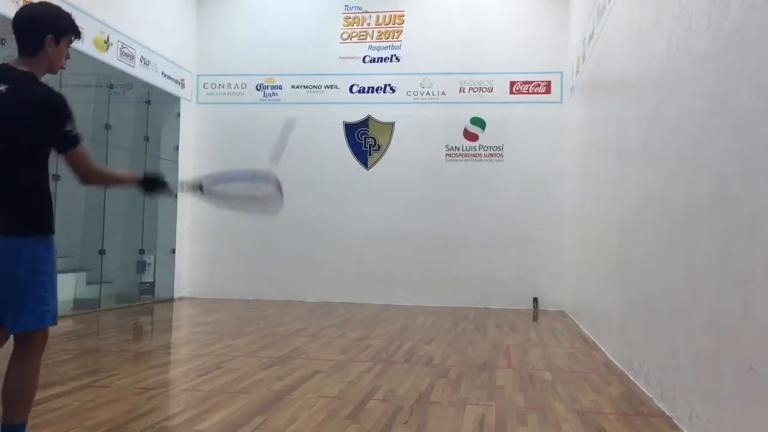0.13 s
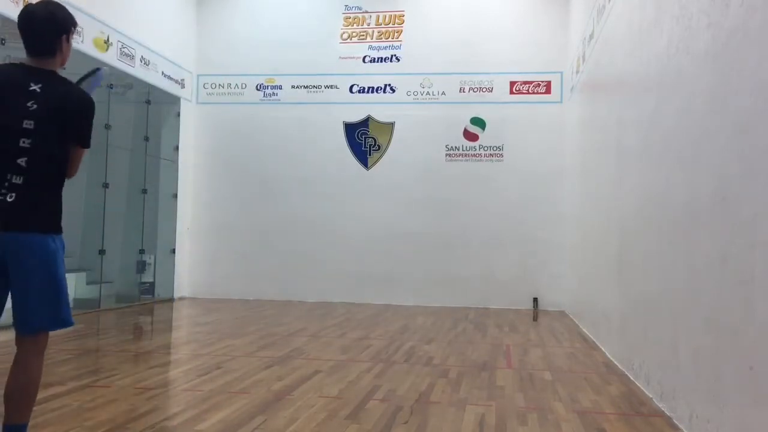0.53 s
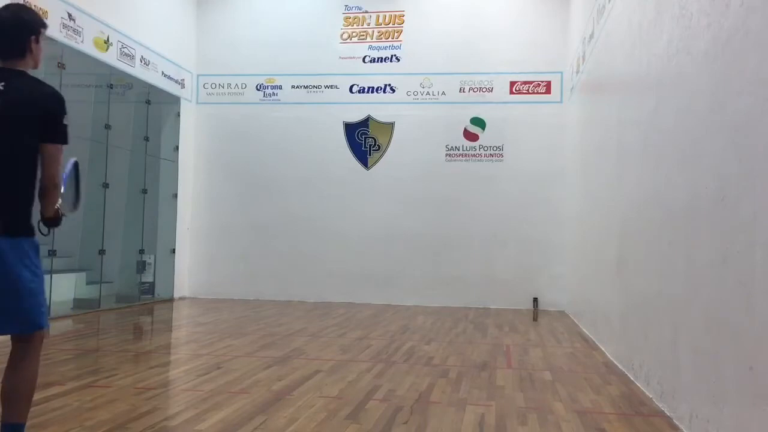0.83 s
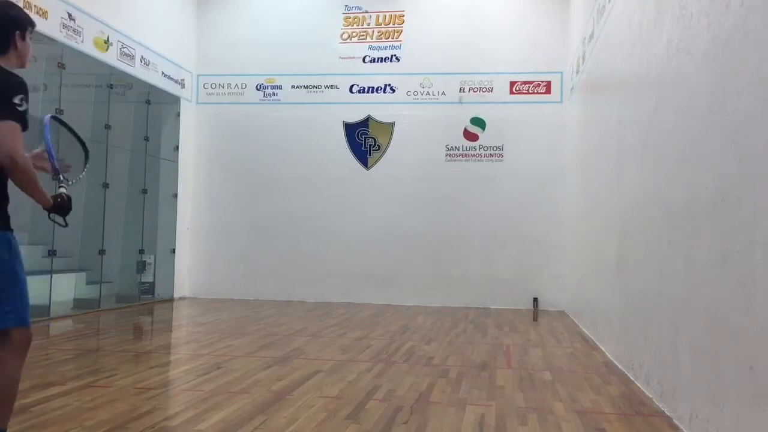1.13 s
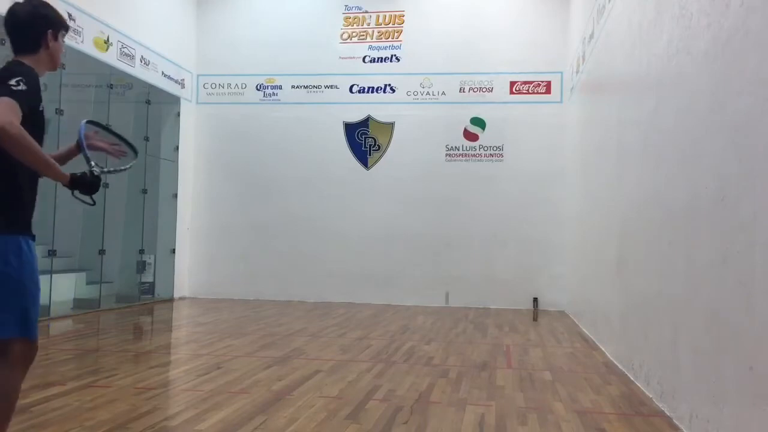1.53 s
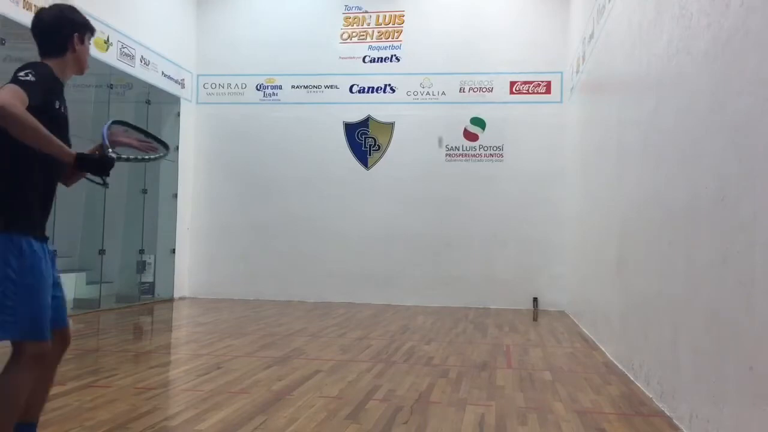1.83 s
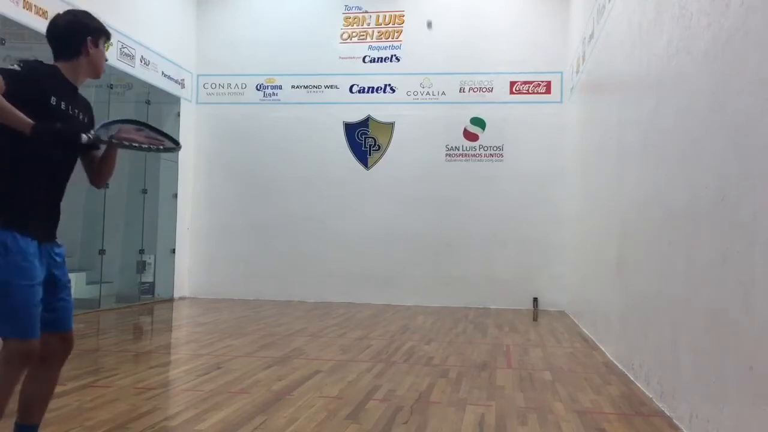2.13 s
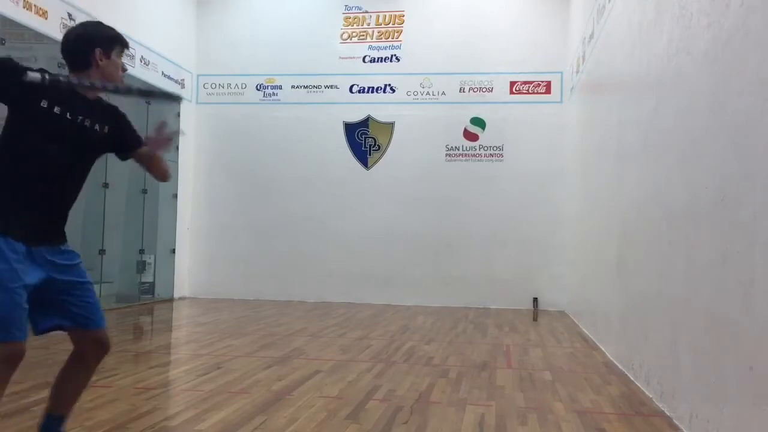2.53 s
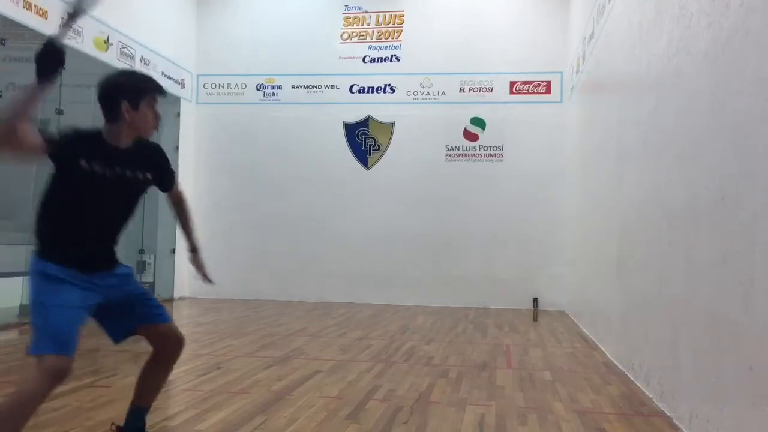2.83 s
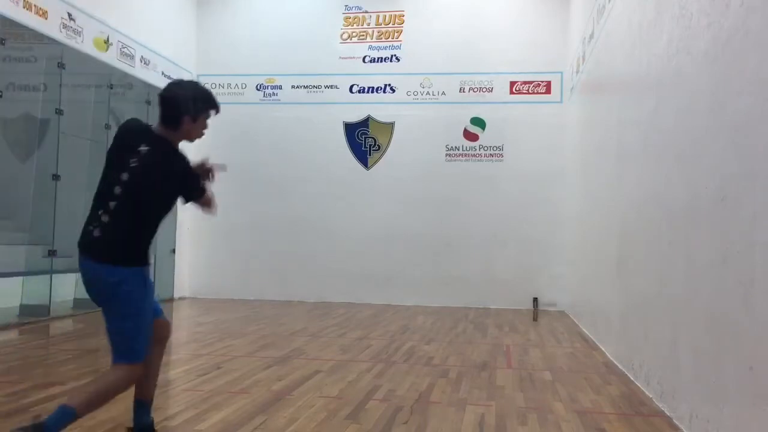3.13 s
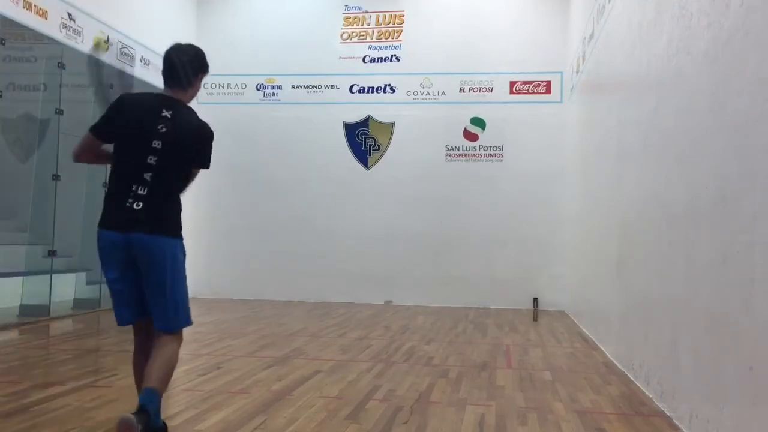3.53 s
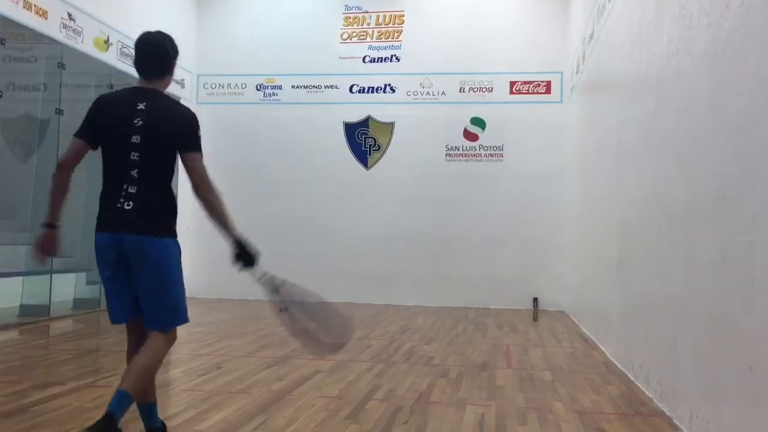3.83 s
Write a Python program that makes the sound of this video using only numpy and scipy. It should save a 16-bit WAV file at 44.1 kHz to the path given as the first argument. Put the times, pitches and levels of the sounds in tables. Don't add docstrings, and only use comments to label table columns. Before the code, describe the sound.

A hollow rubber ball bounces, then a hard racquet stroke cracks loudly in an echoing indoor court

```python
import sys
import numpy as np
from scipy import signal
from scipy.fft import rfft, irfft
from scipy.io import wavfile
from scipy.ndimage import uniform_filter1d

SR = 44100
rng = np.random.default_rng(int(sys.argv[2]) if len(sys.argv) > 2 else 0)


def transcribe(signal):
    frames = np.atleast_2d(signal).T
    limited = np.clip(frames, -1, 1)
    pcm = np.round(limited * 32767).astype(np.int16)
    wavfile.write(sys.argv[1], SR, pcm)


def invert_db(x):
    u = np.asarray(x, float) / 20
    return 10 ** u


N = 176400

# start_s, thump_db, cavity_db, cavity_hz, crack_db
KNOCKS = [
    (-.6, -16.5, -21.5, 887, -17),
    (.283, -27, -22, 879, -35.5),
    (1.337, -17.5, -25.5, 911, -19),
    (2.252, -26, -34, 823, -43),
    (2.872, -32.5, -29.5, 810, -38.5),
]
# start_s, thump_db, cavity_db, cavity_hz, crack_db
FLOOR_BOUNCES = [
    (1.711, -13, -14.5, 829, -15),
]
# start_s, thump_db, cavity_db, cavity_hz, crack_db
HARD_HITS = [
    (3.171, -15, -10, 804, -16),
    (3.177, -19.5, -17.5, 884, -12),
    (3.182, -5.5, 3, 875, -1),
    (3.248, -10.5, -2, 1043, 4),
    (3.33, -12, -5, 765, -7),
    (3.352, -12, -4.5, 841, -7),
    (3.485, -5.5, -5, 711, -2.5),
]
# frequency_hz, level_db (per Hz)
CRACK_COLOUR = [(900, -4.5), (1500, -0.5), (2500, -2.5), (4000, -7), (6000, -8), (7500, -13.5), (9000, -20)]
# start_s, length_s, pitch_hz, level_db, overtone_db
SQUEAKS = [
    (.915, 0.032, 3010, -47, -13),
    (1.328, 0.014, 6440, -42.5, -47),
    (2.24, 0.019, 3900, -56.5, -43),
    (0.8, 0.024, 1800, -54, -21),
]
# start_s, length_s, level_db
SWISHES = [
    (-0.037, 0.045, -60),
    (0.27, 0.2, -64),
    (0.39, 0.027, -63),
    (.912, 0.086, -61),
    (-.2, .1, -65),
]
# frequency_hz, t60_s (time to fall by 60 dB)
COURT_RING = [(60, 1.8), (250, 7.6), (800, 7.26), (2000, 5), (4000, 3.17), (6500, 1.77), (9000, 1.1)]
# frequency_hz, level_db (per Hz)
AIR_COLOUR = [(50, -3), (90, -6), (240, -6), (450, -19), (1200, -18), (4500, -38), (5200, -56), (9000, -51)]

GRAIN = 2048


def at_hz(points, hz):
    table = np.array(points)
    return np.interp(np.log(hz + 1e-9), np.log(table[:, 0]), table[:, 1])


def rms_one(x):
    return x / np.sqrt(np.mean(x ** 2) + 1e-20)


def ring(x, hz, width_hz):
    r = np.exp(-np.pi * width_hz / SR)
    w = 2 * np.pi * hz / SR
    return signal.lfilter([0, np.sin(w)], [1, -2 * r * np.cos(w), r * r], x)


def bands(count, gain):
    white = rng.standard_normal((2, count))
    edges = 22 * 2 ** np.arange(0, 9, 1 / 3)
    total = np.zeros(count)
    for k, (low, high) in enumerate(zip(edges, edges[1:])):
        sos = signal.butter(2, [low, high], "band", fs=SR, output="sos")
        total += gain(np.sqrt(low * high)) * signal.sosfilt(sos, white[k % 2])
    return total


def add(track, s, x):
    i = int((s + 1) * SR)
    track[i:i + len(x)] += x


def crack(noise, length_s):
    hz = np.fft.rfftfreq(GRAIN, 1 / SR)
    colour = invert_db(at_hz(CRACK_COLOUR, hz)) * np.clip(hz / 900, 0, 1) ** 2
    t = np.arange(GRAIN) / SR / length_s
    shape = t * np.exp(-4 * t)
    noise = noise * shape
    for _ in range(4):
        spectrum = rfft(noise)
        noise = irfft(spectrum / np.abs(spectrum + 1e-12) * colour) * np.clip(shape / .07, 0, 1)
    return rms_one(noise)


def hits(track, rows, thump_hz, thump_width_hz, cavity_width_hz, lower_db, upper_db, crack_s, shell=0):
    contact_s, side_width_hz = 0.00036, 264
    t = np.arange(GRAIN) / SR
    push = np.exp(-.5 * ((t - contact_s) / (contact_s / 3)) ** 2)
    push /= push.sum()
    thump = ring(push, thump_hz, thump_width_hz)
    thump -= shell * ring(push, 2.39 * thump_hz, 2 * thump_width_hz)
    for s, thump_db, cavity_db, pitch_hz, crack_db in rows:
        cavity = ring(push, pitch_hz, cavity_width_hz)
        cavity -= invert_db(lower_db) * ring(push, 0.77 * pitch_hz, side_width_hz)
        cavity -= invert_db(upper_db) * ring(push, 1.332 * pitch_hz, side_width_hz)
        cavity += invert_db(-3.5) * ring(push, 2.307 * pitch_hz, side_width_hz)
        add(track, s, invert_db(thump_db) * thump + invert_db(cavity_db) * cavity)
        add(track, s, invert_db(crack_db - 28) * crack(rng.standard_normal(GRAIN), crack_s))


def ball():
    out = np.zeros(N + 2 * SR)
    hits(out, KNOCKS, thump_hz=252.5, thump_width_hz=194, cavity_width_hz=49.5,
         lower_db=-19.5, upper_db=-5, crack_s=.008)
    hits(out, FLOOR_BOUNCES, thump_hz=130.5, thump_width_hz=70.5, cavity_width_hz=87.5,
         lower_db=-15, upper_db=2, crack_s=.022, shell=invert_db(-7))
    hits(out, HARD_HITS, thump_hz=293.5, thump_width_hz=185, cavity_width_hz=151.5,
         lower_db=-4.5, upper_db=-2, crack_s=.014)
    return signal.sosfilt(signal.butter(3, 120, "high", fs=SR, output="sos"), out)


def squeaks():
    out = np.zeros(N + 2 * SR)
    jitter_hz, third_db = 290, 4
    for s, length_s, pitch_hz, level_db, overtone_db in SQUEAKS:
        n = int(length_s * SR)
        waver = uniform_filter1d(rng.standard_normal(SR // 2), size=130)[:n]
        pitch = pitch_hz + jitter_hz * rms_one(waver - waver.mean())
        phase = np.cumsum(2 * np.pi / SR * pitch)
        overtones = np.sin(2 * phase) + invert_db(third_db) * np.sin(3 * phase)
        tone = np.sin(phase) + invert_db(overtone_db) * overtones
        add(out, s, invert_db(level_db) * tone * np.hanning(n) ** .5)
    return out


def swishes():
    out = np.zeros(N + 2 * SR)
    sos = signal.butter(2, [3320, 8500], "band", fs=SR, output="sos")
    for s, length_s, level_db in SWISHES:
        n = int(length_s * SR)
        hiss = rms_one(signal.sosfilt(sos, rng.standard_normal(SR // 2)))[:n]
        add(out, s, invert_db(level_db) * hiss * np.hanning(n))
    return out


def court(x):
    tail_db, build_s = -28.5, 0.0027
    flutter_s, flutter_db, flutter_t60_s = .073, 4.5, .6
    t = np.arange(N + SR) / SR
    answer = bands(len(t), lambda hz: invert_db(tail_db - 60 * t / at_hz(COURT_RING, hz)))
    answer *= 1 - np.exp(-t / build_s)
    answer[0] += 1
    slaps = flutter_s * np.arange(1, 9)
    for k, lag_s in enumerate((.0, .0013, .0031)):
        level = invert_db(flutter_db - 6.4 * k - 60 * slaps / flutter_t60_s)
        answer[((slaps + lag_s) * SR).astype(int)] += (-1) ** k * level
    return signal.fftconvolve(x, answer)[SR:SR + N]


def ventilation():
    patchy_db = -0.26
    knots = np.arange(0, N + 2 * SR, 3000)

    def patches():
        return patchy_db * np.interp(np.arange(N + SR), knots, rng.standard_normal(len(knots)))

    air = bands(N + SR, lambda hz: invert_db(at_hz(AIR_COLOUR, hz) + patches()))[SR:]
    hum = ring(rng.standard_normal(N + SR), 74.2, 6.1)[SR:]
    return invert_db(-35) * rms_one(air) + invert_db(-34) * rms_one(hum)


def scene():
    return (court(ball() + squeaks() + swishes()) + ventilation())[None]


def drop_faint_treble(x):
    hole_db, spread_db, from_hz = -30, 3.5, 3000
    hz, _, z = signal.stft(x, SR, nperseg=1024)
    power = np.abs(z) ** 2
    group = np.repeat(power[:512].reshape(64, 8, -1).mean(1), 8, 0)
    luck = np.repeat(rng.standard_normal((64, z.shape[1])), 8, 0)
    limit = power.mean(0) * invert_db(hole_db + spread_db * luck) ** 2
    weak = (group + power[:512]) / 2 < limit
    z[:512] *= ~(weak & (hz[:512, None] > from_hz))
    return signal.istft(z, SR, nperseg=1024)[1][:N]


def band_limit(x):
    return signal.sosfilt(signal.butter(12, 9300, fs=SR, output="sos"), x)


def record(dry):
    knee_db, squeeze, release_db_per_s, clip = -14, 0.2, 20.5, .69
    level = 10 * np.log10(uniform_filter1d(dry[0] ** 2, size=220) + 1e-12)
    fall = release_db_per_s * np.arange(N) / SR
    held = np.maximum.accumulate(level + fall) - fall
    gain = invert_db(-squeeze * uniform_filter1d(np.maximum(held - knee_db, 0), size=220))
    x = signal.sosfilt(signal.cheby2(12, 70, 9000 * 1.218, fs=SR, output="sos"), dry * gain)
    x = signal.sosfilt(signal.butter(2, 62.5, "high", fs=SR, output="sos"), x)
    mix = np.clip(drop_faint_treble(x[0])[None], -clip, clip)
    return band_limit(mix)


dry = scene()
out = record(dry)
transcribe(out)
```